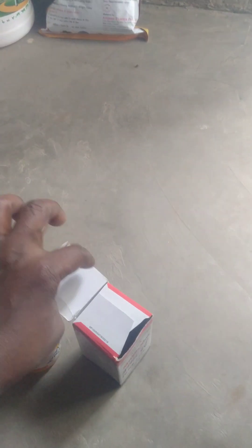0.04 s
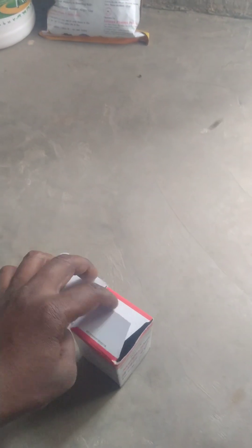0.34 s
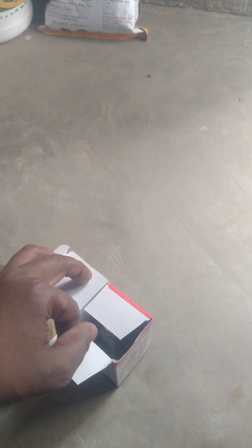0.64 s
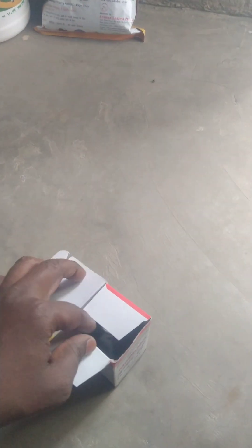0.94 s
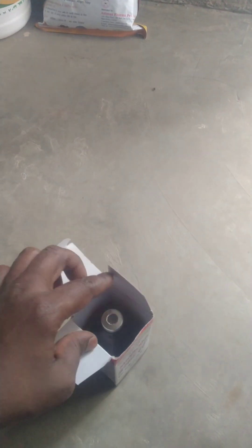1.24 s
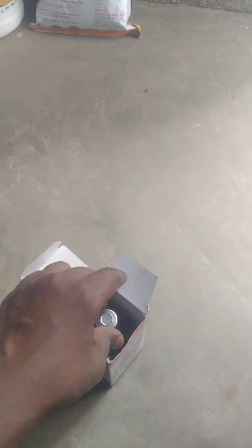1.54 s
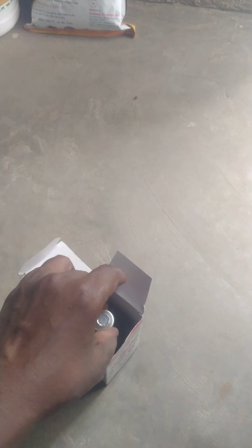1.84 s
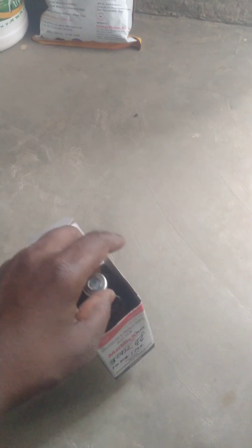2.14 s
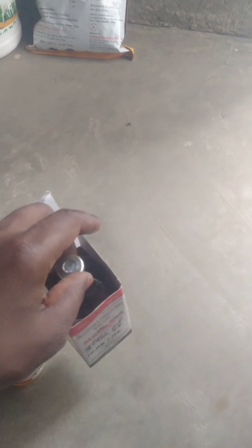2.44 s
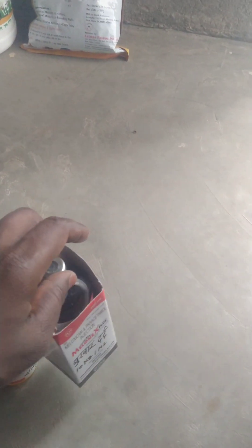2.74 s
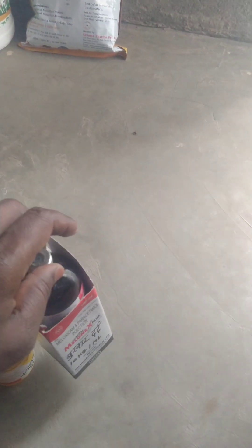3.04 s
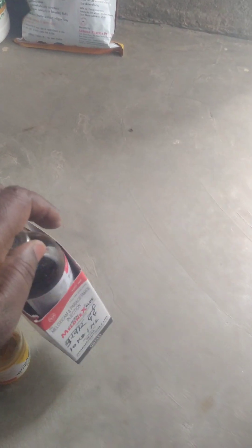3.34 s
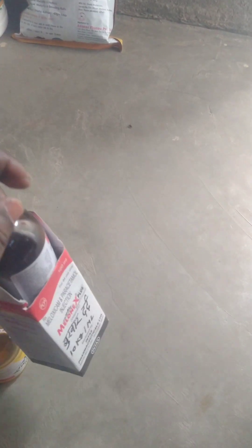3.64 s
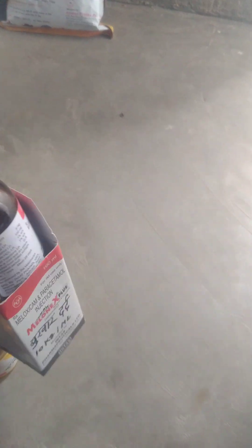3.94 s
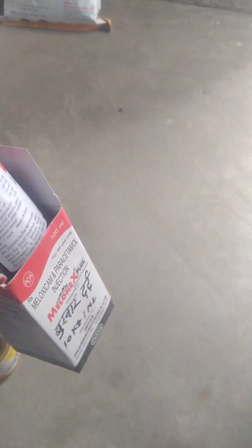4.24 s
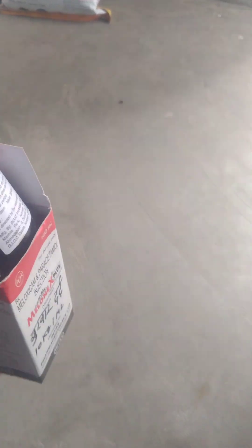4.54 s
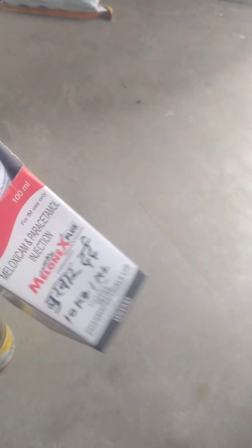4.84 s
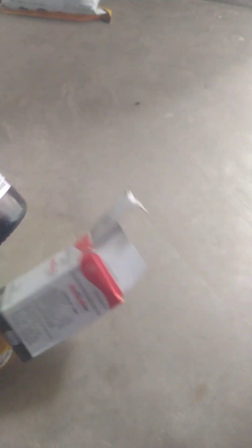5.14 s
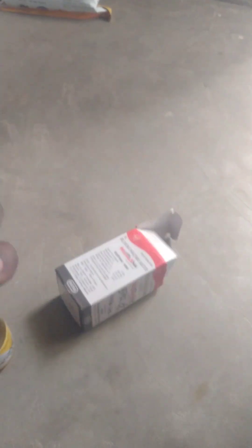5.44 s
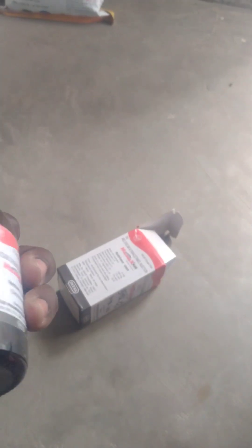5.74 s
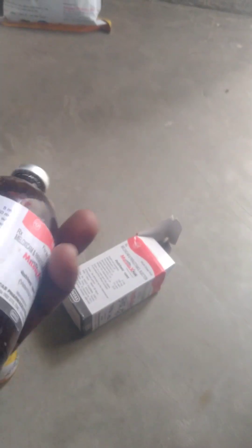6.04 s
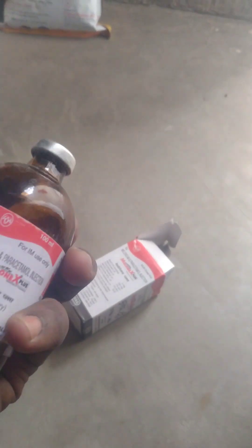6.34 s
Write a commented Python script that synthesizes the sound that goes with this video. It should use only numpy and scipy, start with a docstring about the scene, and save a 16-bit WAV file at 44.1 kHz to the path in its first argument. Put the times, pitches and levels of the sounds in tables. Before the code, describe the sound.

Close by in a bare, hard room, a small cardboard box is opened: light rubbing and little clicks from the flaps. Soft, uneven scraping follows as a glass bottle slides out, ending in several hollow knocks. Then comes the loudest sound, the empty box slapping onto concrete and toppling with a brief clatter. A short echo fades into a faint hush and low rumble.

```python
"""A bare, hard room with a concrete floor. Fingers fold open a small cardboard carton and work a glass
vial out of it: stick-slip friction makes the board scrape, and creases snap as their fibres give way.
The vial knocks free; the empty carton drops, bounces and topples, each impact exciting the damped modes
of its panels and air space. The room reverberates, over a hush, a low rumble and faint far whistles."""
import sys
import numpy as np
from scipy import signal
from scipy.fft import rfft, irfft, next_fast_len
from scipy.io import wavfile
from scipy.ndimage import uniform_filter1d, map_coordinates

SR = 44100
rng = np.random.default_rng(int(sys.argv[2]) if len(sys.argv) > 2 else 0)


def int16_out(signal):
    """Quantize to a 16-bit WAV file."""
    q = np.round(np.clip(np.atleast_2d(signal).T, -1, 1) * 32767)
    wavfile.write(sys.argv[1], SR, q.astype(np.int16))


N = 286881

# Levels in all tables are relative. Friction strokes. Each row: start in seconds, length in seconds,
# board level in dB, hiss over board in dB, panel resonance in Hz.
FINGER_STROKES = [(0.0, 0.033, -53, 1, 1920), (0.06, 0.067, -64, -13.5, 1500),
                  (0.175, 0.042, -57, -15.5, 1080), (0.303, 0.052, -57, -9.5, 1400),
                  (0.397, .03, -57.5, -12, 1400), (0.44, 0.083, -71, 4, 1650),
                  (0.548, 0.056, -58, -8.5, 1920), (0.62, 0.022, -55, -9, 1700),
                  (0.68, 0.056, -64.5, -1, 1560), (0.809, 0.028, -55, -4.5, 2500),
                  (0.857, 0.014, -58.5, 1, 2200), (0.975, 0.039, -74, 9, 1800),
                  (1.172, 0.038, -56.5, -3, 1850), (1.34, 0.037, -58.5, -9.5, 1650),
                  (1.412, 0.15, -59.5, -4, 1970), (1.54, 0.093, -60, -9.5, 1650),
                  (1.838, 0.013, -52, -2.5, 2010)]  # skin on the flaps
LIFT_STROKES = [(1.96, 0.19, -56.5, -4.5, 1720)]  # the wall, gripped and lifted
VIAL_STROKES = [(2.385, .075, -60.5, -1.5, 1350), (2.577, 0.0082, -61, -2, 1040),
                (2.63, 0.094, -71, -2, 1250), (2.8, 0.04, -60, 0.5, 1630), (3.03, 0.027, -57.5, 0, 1020),
                (3.02, 0.47, -68.5, -1, 1051), (3.148, 0.046, -58.5, -4.5, 1510),
                (3.23, 0.031, -62, -3, 1010), (3.33, 0.09, -62, -1, 1040), (3.425, 0.066, -58, -1.5, 1080),
                (3.558, 0.049, -60.5, 0, 1190), (3.608, 0.042, -55.5, -4.5, 2010),
                (3.66, 0.11, -65, -5, 1210), (3.9, 0.12, -59, -7.5, 1100),
                (3.968, 0.023, -52.5, -3.5, 1060), (4.09, 0.061, -78, 1, 1500),
                (4.345, 0.044, -64, -5, 1420), (4.797, 0.092, -61, -5, 1390),
                (4.865, 0.088, -54, -5.5, 1250), (4.994, .012, -60, 5, 1600),
                (5.04, 0.069, -50.5, -5, 1450)]  # glass along the walls
SKID_STROKES = [(5.472, 0.029, -39, -20, 900), (5.494, 0.01, -38.5, -7, 1550), (5.612, 0.041, -45, -5, 890)]  # the toppling carton on concrete
# Clicks. Each row: start in seconds, level in dB, pitch in Hz, crack offset in dB.
CREASE_SNAPS = [(0.016, -29, 4530, -13), (0.043, -39, 1960, -1), (0.269, -34, 1970, -12),
                (0.307, -41, 970, -19), (0.335, -44.5, 1800, -8.5), (0.402, -44, 1080, -4),
                (0.518, -49.5, 1680, 1), (0.582, -38.5, 1980, -12.5), (0.813, -40, 2520, -19),
                (0.873, -35.5, 1920, -9), (1.184, -46, 1950, -9), (1.839, -31, 2040, -33),
                (1.843, -34.5, 1960, -23), (1.848, -33.5, 1980, -14), (1.959, -47.5, 1720, -1),
                (1.982, -45, 1020, -12), (2.089, -31, 1780, -16), (2.101, -25, 1750, -19),
                (2.107, -32, 1790, -17), (2.455, -42, 1830, -4), (2.583, -37, 1065, -13),
                (2.761, -51.5, 2460, -3.5), (2.914, -48, 1000, -4), (3.045, -38, 990, -21),
                (3.613, -37, 2380, -12.5), (4.188, -49.5, 5750, -5.5)]
VIAL_KNOCKS = [(3.98, -33, 1007, -12), (4.353, -48, 826, -13), (4.801, -48.5, 1530, -13),
               (4.904, -26, 1540, -21.5), (4.918, -31.5, 1000, -14), (4.94, -37.5, 1470, -20),
               (5.027, -30, 2263, -20), (5.06, -35.5, 851, -6.5), (5.078, -38, 1660, -10.5),
               (5.113, -16.5, 970, -14.5), (5.169, -22.5, 1530, -25), (5.182, -27.5, 2500, -16)]
# Fingertips pressing the box. Each row: start in seconds, level in dB.
FINGER_PRESSES = [(0.029, -51.5), (0.881, -49.5), (1.191, -44), (2.031, -47), (2.455, -50.5), (2.912, -54)]
# Floor impacts. Each row: start in seconds, ring, crack and thud levels in dB, contact time in seconds.
FLOOR_BOUNCES = [(5.3084, -17, -50, -49, 0.0042), (5.313, -12.5, -9, -31, 0.0016),
                 (5.317, -9.5, -31, -31, 0.00029), (5.477, -34, -49, -33.5, 0.0058),
                 (5.499, -31, -38, -35.5, 0.0039), (5.5235, -19, -24.5, -31.5, 0.002),
                 (5.571, -26.5, -34.5, -46.5, 0.0011), (5.607, -30.5, -36, -45, 0.0007),
                 (5.639, -43, -52, -44.5, .001)]
# Distant tones. Each row: start in seconds, length in seconds, frequency in Hz, level in dB.
FAR_WHISTLES = [(4.02, 0.21, 5630, -79), (4.067, 0.14, 7100, -77.5), (6.171, 0.18, 5790, -85)]
# Modes of vibration. Each row: frequency in Hz, level in dB, time to decay by 60 dB in seconds.
PANEL_MODES = [(708, -14, .025), (892, -6.5, .05), (1016, -11.5, 0.05), (1144, -14, .04),
               (1515, 1.5, 0.024), (1810, -1.5, 0.021), (2066, -11, .03), (2480, -22, .015),
               (3100, -18, 0.013), (4220, -17.5, 0.022), (5150, -17, 0.015)]  # the empty carton's faces
CAVITY_MODES = [(162, -1, 0.051), (249, 1, .06), (315, -5, 0.047), (384.3, -5.5, 0.056)]  # its air space and whole-body flexing
FREED_MODES = [(1110, 0, .2), (1135, -4.5, .2)]  # the freed vial and carton
# Spectra. Each row: frequency in Hz, level in dB.
HUSH_SPECTRUM = [(40, -18.5), (120, 0), (250, 2.5), (420, 2), (620, -6), (1000, -4), (1420, 1), (2000, -3),
                 (3200, -15.5), (5000, -14.5), (7500, -17)]
RUMBLE_SPECTRUM = [(3, 1.5), (8, 13.5), (13, 10.5), (22, -2), (50, -2), (75, -5.5), (110, -18.5),
                   (200, -15.5), (400, -43), (1000, -94)]
FLAP_RUB_SPECTRUM = [(71, -0.5), (120, -3.5), (242, -2.5), (289, -24), (396, -5.5), (660, -22), (954, -4.5),
                     (1200, -8.5), (1960, -6), (2550, -10), (3560, -28), (4720, -18), (6590, -22),
                     (7460, -23.5), (8000, -27), (10400, -54), (17600, -120)]
LIFT_RUB_SPECTRUM = [(110, -16), (260, -20), (480, -3.5), (630, -20.5), (850, -9), (1080, 5), (1400, -8),
                     (1750, -0.5), (2200, -6.5), (3300, -17), (4700, -3.5), (6000, -13.5), (7200, -11.5),
                     (8000, -26)]
WALL_RUB_SPECTRUM = [(100, -20.5), (230, -11), (430, -6), (630, -14.5), (850, 0.5), (1030, 2.5),
                     (1350, -7.5), (1750, -2), (2100, -6.5), (2450, -3), (3300, -21), (4700, -19.5),
                     (6000, -23), (7300, -26.5)]  # the carton against glass or concrete
CRACK_SPECTRUM = [(400, -24.5), (900, -4), (2300, 3), (3000, -6), (4800, 1), (6000, -8), (7200, -1),
                  (8000, -18), (9000, -33.5)]
CLAP_SPECTRUM = [(120, -30), (300, -10.5), (520, -14), (750, -11.5), (1000, -2), (1230, -6.5), (1550, 2.5),
                 (2100, -4), (2800, -12.5), (4500, -19), (7500, -31.5)]  # many panel modes blurred together
ECHO_SPECTRUM = [(100, -2), (400, 4.5), (850, -2), (1500, 0), (4000, 0.5), (7500, -2.5)]  # what the room's walls send back
# The course of the hush. Each row: time in seconds, level in dB.
HUSH_LEVELS = [(0, -65), (4.6, -63.5), (6.0, -67.5), (6.5, -69)]
# The room's reverberation. Each row: frequency in Hz, time to decay by 60 dB in seconds.
ROOM_DECAY = [(150, 0.3), (500, 0.64), (1500, 0.48), (4000, 0.51), (8000, .36)]

SNAP_THUD_DB = -6.5  # the box's thud follows the crack that drives it
KNOCK_THUD_DB, THUD_DB_PER_OCTAVE = -13, -15.5  # at 1 kHz; stiffer, higher spots move the box less
FREED_S, FREED_DB = 5.125, -40.5  # the ring as the vial comes free
BAND_LIMIT_HZ = 7850


def amp(db):
    """Decibels as an amplitude ratio."""
    return 10 ** (np.asarray(db) / 20)


def unit(x):
    """Normalisation to an rms of 1."""
    return x / np.sqrt(np.mean(x ** 2) + 1e-20)


def along(points, hz):
    """Interpolation of (Hz, value) points on a logarithmic frequency axis."""
    freqs, values = np.transpose(points)
    return np.interp(np.log(hz + 1), np.log(freqs + 1), values)


def curve(points):
    """Linear interpolation of (seconds, value) points at every sample."""
    times, values = np.transpose(points)
    return np.interp(np.arange(N) / SR, times, values)


def wobble(rate):
    """Smooth fluctuation: a spline through `rate` random knots a second."""
    return map_coordinates(rng.standard_normal(int(N * rate / SR) + 4), [np.arange(N) * rate / SR])


def filtered(x, response):
    """Linear filtering: the spectrum of x is multiplied by a frequency response."""
    size = next_fast_len(len(x) + 8192)
    return irfft(rfft(x, size) * response(np.fft.rfftfreq(size, 1 / SR)), size)[:len(x)]


def coloured(x, spectrum):
    """Spectral shaping, scaled to an rms of 1."""
    return unit(filtered(x, lambda hz: amp(along(spectrum, hz))))


def add(track, start_s, sound):
    """Superposition: a sound joins the track at its start time."""
    start = max(round(start_s * SR), 0)
    track[start:start + len(sound)] += sound[:N - start]


def air():
    """Ambient noise: a broadband hush over a slowly heaving rumble."""
    hush = amp(curve(HUSH_LEVELS)) * coloured(rng.standard_normal(N), HUSH_SPECTRUM)
    rumble = amp(-58 + 1.2 * wobble(8.8)) * coloured(rng.standard_normal(N), RUMBLE_SPECTRUM)
    return hush + rumble


def strokes(rows, grip_share, swell_db, release_s):
    """Friction envelopes: each stroke takes hold, swells or sags, then decays exponentially."""
    t = np.arange(N) / SR
    board, hiss, pitch = np.zeros(N), np.zeros(N), []
    for start, length, db, hiss_db, hz in rows:
        progress = np.clip((t - start) / length, 0, 1)
        gain = np.minimum(progress / grip_share, 1) * amp(db + swell_db * progress)
        gain *= np.exp(-np.maximum(t - start - length, 0) / release_s)
        board = np.maximum(board, gain)
        hiss = np.maximum(hiss, amp(hiss_db) * gain)
        pitch.append((start + length / 2, hz))
    return board, hiss, curve(sorted(pitch))


def panel_resonance(x, panel_hz, boost_db, octaves, patchy_db):
    """Forced resonance: the pressed panel favours a pitch set by the grip; lesser peaks come and go."""
    hz, t, spectra = signal.stft(x, SR, nperseg=512)
    centre = np.interp(t, np.arange(N) / SR, panel_hz)
    peak = np.exp(-(np.log2((hz[:, None] + 1) / centre) / octaves) ** 2)
    patches = uniform_filter1d(rng.standard_normal(spectra.shape), size=5, axis=0)
    patches = unit(uniform_filter1d(patches, size=9, axis=1))
    return signal.istft(spectra * amp(boost_db * peak + patchy_db * patches), nperseg=512)[1][:N]


def rubbing(motion, spectrum, slips_per_s, spread_db, smooth, judder_db, boost_db, split_hz):
    """Stick-slip friction: tiny slips of uneven size drive the board and hiss on its surface."""
    board_gain, hiss_gain, panel_hz = motion
    sizes = amp(spread_db * np.minimum(rng.exponential(size=N), 3)) * rng.standard_normal(N)
    slips = unit(sizes * (rng.random(N) < slips_per_s / SR))
    force = slips + smooth * rng.standard_normal(N)
    sound = coloured(force * amp(judder_db * wobble(70)), spectrum)
    sound = panel_resonance(sound, panel_hz, boost_db, octaves=.2, patchy_db=2.5)
    board = filtered(sound, lambda hz: 1 / (1 + (hz / split_hz) ** 8))
    return board_gain * unit(board) + hiss_gain * unit(sound - board)


def friction():
    """Sliding friction of skin on the flaps and wall, glass in the carton, and the carton on concrete."""
    stroking = strokes(FINGER_STROKES, grip_share=.1, swell_db=-2, release_s=.017)
    pulling = strokes(LIFT_STROKES, grip_share=.2, swell_db=6.5, release_s=.011)
    sliding = strokes(VIAL_STROKES, grip_share=.2, swell_db=-2, release_s=.02)
    skidding = strokes(SKID_STROKES, grip_share=.27, swell_db=-4.5, release_s=.0056)
    fingers = rubbing(stroking, FLAP_RUB_SPECTRUM, slips_per_s=1300, spread_db=2.5,
                      smooth=1, judder_db=.5, boost_db=5.5, split_hz=3000)
    lift = rubbing(pulling, LIFT_RUB_SPECTRUM, slips_per_s=1500, spread_db=1,
                   smooth=1, judder_db=2.4, boost_db=2, split_hz=3000)
    vial = rubbing(sliding, WALL_RUB_SPECTRUM, slips_per_s=1100, spread_db=1.5,
                   smooth=.79, judder_db=1, boost_db=7, split_hz=3700)
    skid = rubbing(skidding, WALL_RUB_SPECTRUM, slips_per_s=1600, spread_db=2.5,
                   smooth=.64, judder_db=5, boost_db=12, split_hz=5300)
    return amp(-.5) * fingers + amp(2) * lift + vial + amp(3.5) * skid


def room(early_db, early_t60, late_db):
    """Impulse response of one path: early reflections from near walls, then diffuse reverberation."""
    hz, _, spectra = signal.stft(rng.standard_normal(SR), SR, nperseg=256)
    frame_s = np.linspace(0, 1, spectra.shape[1])
    decay = amp(-60 * frame_s / along(ROOM_DECAY, hz)[:, None])
    late = signal.istft(spectra * decay, SR, nperseg=256)[1][:SR]
    t = np.arange(SR) / SR
    early = rng.standard_normal(SR) * amp(-60 * t / early_t60)
    tail = amp(early_db) * early / np.linalg.norm(early) + amp(late_db) * late / np.linalg.norm(late)
    onset = np.clip(t / .0091, 0, 1)
    return filtered(tail * onset, lambda hz: amp(along(ECHO_SPECTRUM, hz)))


def ring(modes, contact_s, scatter_db, detune=.023, size=8192):
    """Damped free vibration: each blow varies the modes a little; a longer contact swells more slowly."""
    t = np.arange(size) / SR
    hz, db, t60 = np.transpose(modes)[:, :, None]
    hz = hz * (1 + detune * rng.standard_normal(hz.shape))
    db = db + scatter_db * rng.standard_normal(hz.shape)
    sound = np.sum(amp(db - 60 * t / t60) * np.sin(2 * np.pi * hz * t), axis=0)
    sound *= 1 - np.exp(-t / contact_s)
    return sound / (3 * np.std(sound[t < .01]))  # peaks near 1


def burst(spectrum, contact_s, t60, size=8192):
    """Transient noise: fibres crushed in a contact give a brief, exponentially decaying burst."""
    t = np.arange(size) / SR
    envelope = (1 - np.exp(-t / contact_s)) * amp(-60 * t / t60)
    return .5 * coloured(rng.standard_normal(size), spectrum) * envelope / envelope.max()


def snaps():
    """Sudden release of strain: a crease gives way, fibres crack, the flap rings and the box thuds."""
    track = np.zeros(N)
    for start, db, hz, crack_db in CREASE_SNAPS:
        flap = amp(-7) * ring([(hz, 0, .018), (hz * 1.12, -6, .014)], contact_s=.0011, scatter_db=2)
        crack = amp(crack_db + 1.5) * burst(CRACK_SPECTRUM, contact_s=.00017, t60=.027)
        thud = amp(crack_db + SNAP_THUD_DB) * ring(CAVITY_MODES, contact_s=.0036, scatter_db=9.5)
        add(track, start, amp(db) * (flap + crack + thud))
    return track


def presses():
    """Soft contact excites only low modes: a fingertip flexes the whole box without a crack."""
    track = np.zeros(N)
    for start, db in FINGER_PRESSES:
        add(track, start, amp(db) * ring(CAVITY_MODES, contact_s=.004, scatter_db=1, detune=.055))
    return track


def knocks():
    """Impact excitation: the vial bumps the carton, one panel foremost, and rings faintly once free."""
    track = np.zeros(N)
    for start, db, hz, crack_db in VIAL_KNOCKS:
        thud_db = KNOCK_THUD_DB + THUD_DB_PER_OCTAVE * np.log2(hz / 1000)
        panel = amp(-8) * ring([(hz, 0, .028)], contact_s=.001, scatter_db=1)
        walls = amp(-6) * burst(WALL_RUB_SPECTRUM, contact_s=.0012, t60=.03)
        crack = amp(crack_db + 1.5) * burst(CRACK_SPECTRUM, contact_s=.00074, t60=.025)
        thud = amp(thud_db) * ring(CAVITY_MODES, contact_s=.003, scatter_db=5.5)
        add(track, start, amp(db) * (panel + walls + crack + thud))
    add(track, FREED_S, amp(FREED_DB) * ring(FREED_MODES, contact_s=.0076, scatter_db=1.5, detune=.005))
    return track


def whistles():
    """Random amplitude and phase modulation: thin, high tones flutter as they swell and fade."""
    track, t = np.zeros(N), np.arange(N) / SR
    for start, length, hz, db in FAR_WHISTLES:
        swell = np.sin(np.pi * np.clip((t - start) / length, 0, 1))
        gain = amp(db + 5 + 2.5 * wobble(55))
        track += gain * swell * np.sin(2 * np.pi * hz * t + wobble(130))
    return track


def slap(ring_db, crack_db, thud_db, contact_s, clap_db):
    """Modal overlap: on landing, panel modes blur into a clap; the edge cracks, the air space thuds."""
    panels = ring(PANEL_MODES, contact_s, scatter_db=2.8, detune=.0048)
    clap = amp(clap_db) * burst(CLAP_SPECTRUM, contact_s, t60=.0094)
    crack = amp(crack_db - 4.5) * burst(CRACK_SPECTRUM, contact_s, t60=.011)
    thud = amp(thud_db) * ring(CAVITY_MODES, contact_s, scatter_db=4)
    return amp(ring_db) * (panels + clap) + crack + thud


def fall(face_pairs=3):
    """Inelastic collisions: the carton lands corner first, slaps flat, bounces and settles."""
    track = np.zeros(N)
    for start, *blow in FLOOR_BOUNCES:
        add(track, start, slap(*blow, clap_db=-3.5))
        for _ in range(face_pairs):  # each pair radiates its own mix of modes into the room
            path = room(early_db=-13, early_t60=.16, late_db=-14)
            add(track, start, signal.fftconvolve(slap(*blow, clap_db=-1.5), path))
    return track


def scene():
    """Superposition of the close handling, its echo, the falling carton and the background, in mono."""
    handling = friction() + snaps() + presses() + knocks()
    echo = signal.fftconvolve(handling, room(early_db=-11, early_t60=.51, late_db=-12.5))[:N]
    return (handling + echo + fall() + whistles() + air())[None]


def record(dry):
    """Band limiting: a steep low-pass filter removes the highest treble."""
    return np.array([filtered(x, lambda hz: 1 / np.sqrt(1 + (hz / BAND_LIMIT_HZ) ** 90)) for x in dry])


dry = scene()
out = record(dry)
int16_out(out)
```